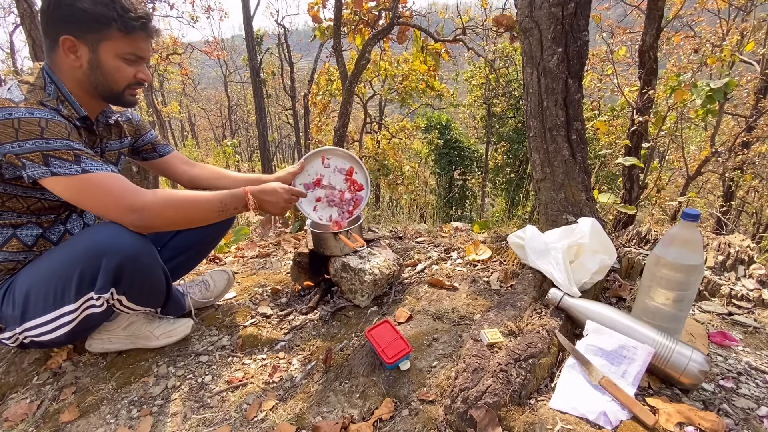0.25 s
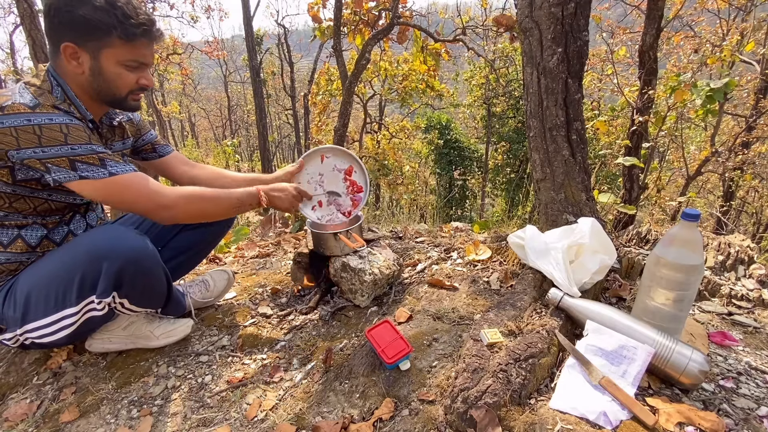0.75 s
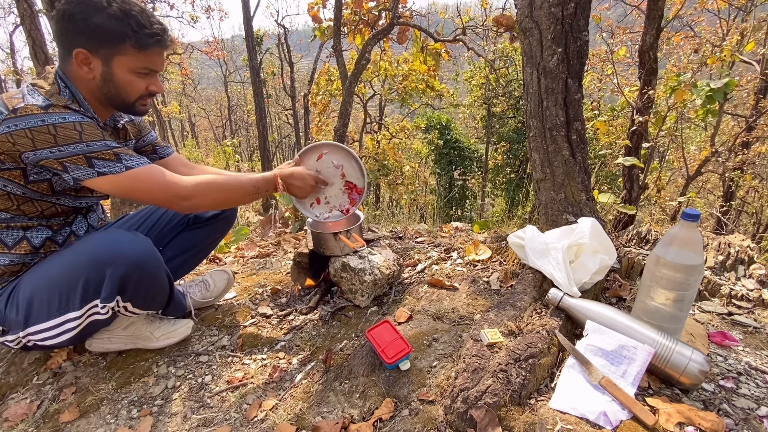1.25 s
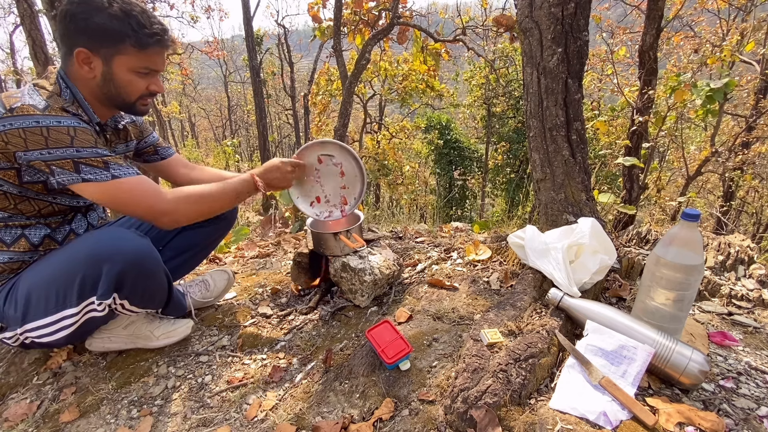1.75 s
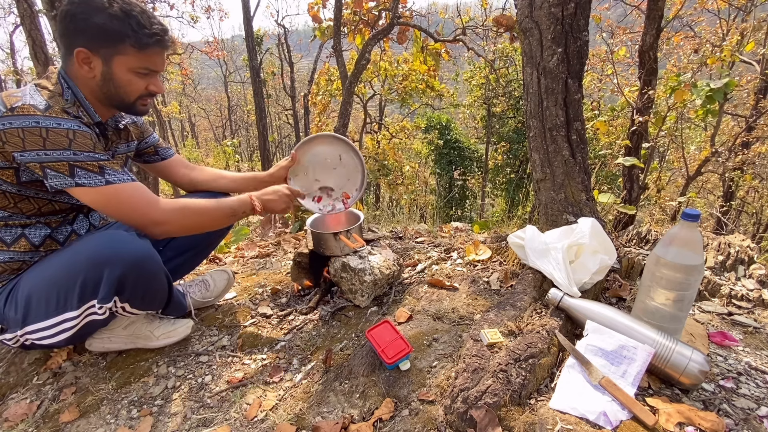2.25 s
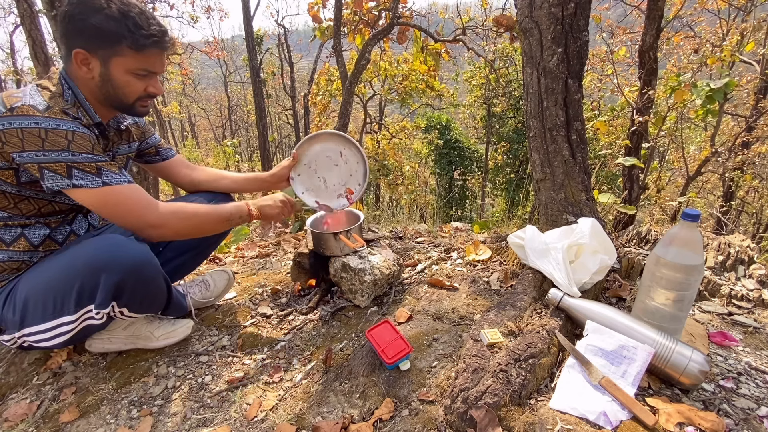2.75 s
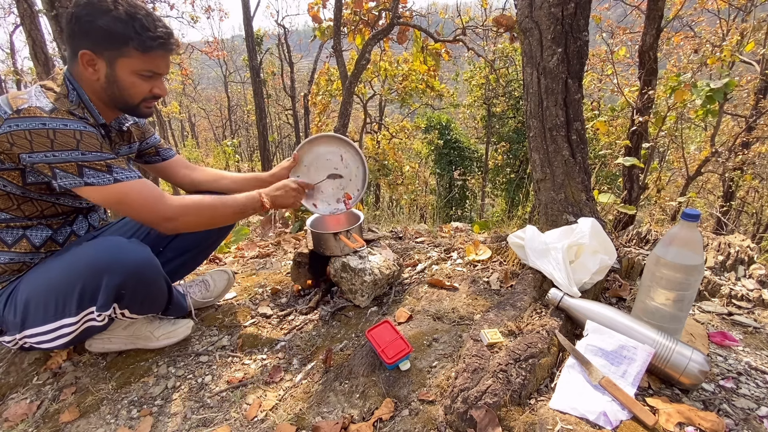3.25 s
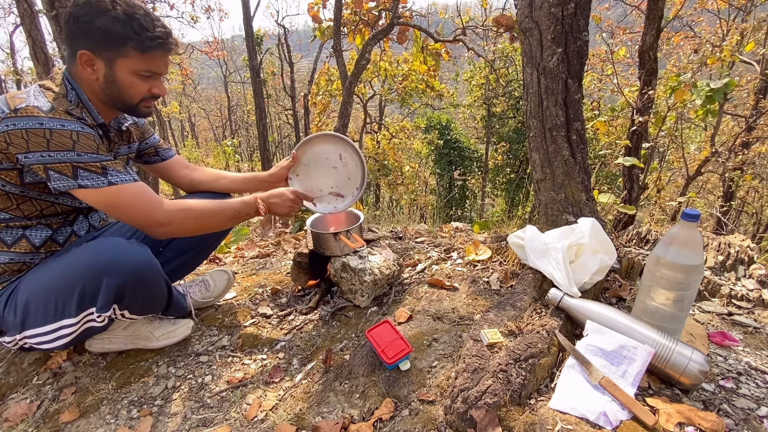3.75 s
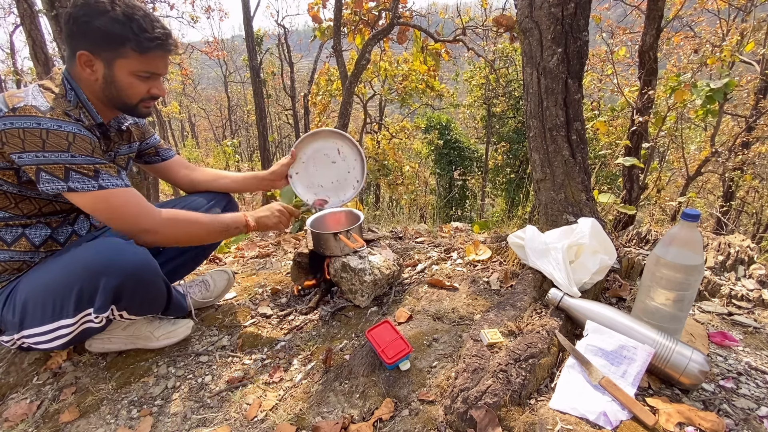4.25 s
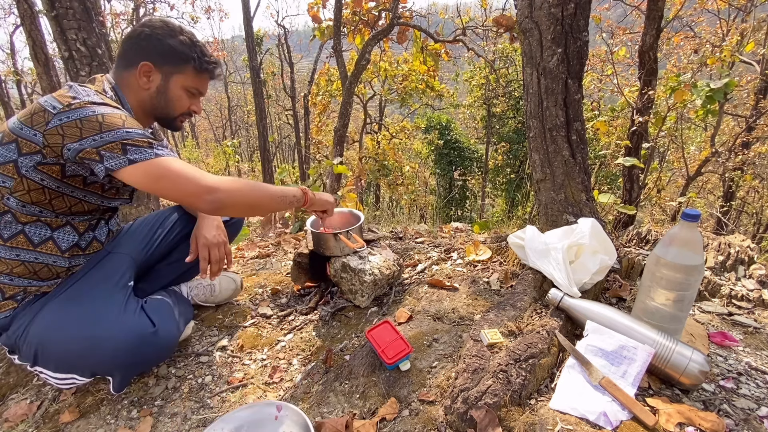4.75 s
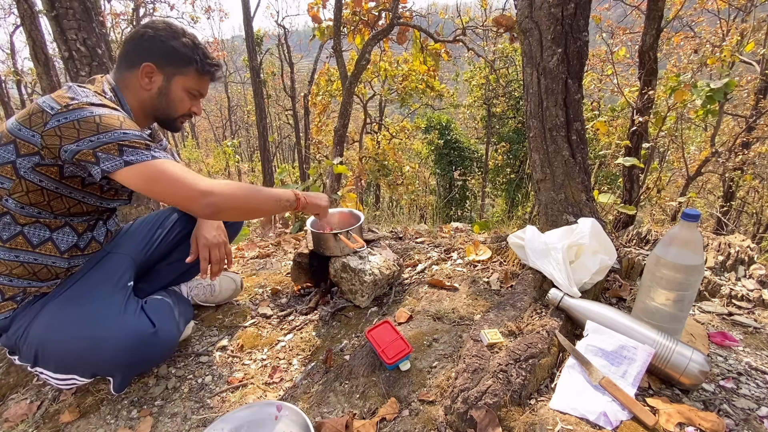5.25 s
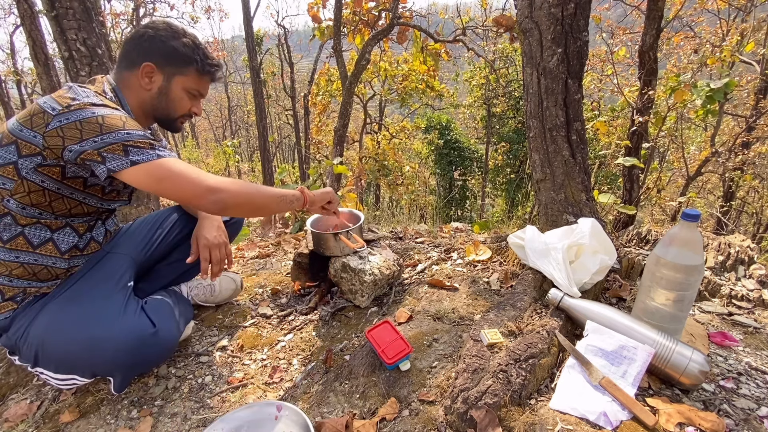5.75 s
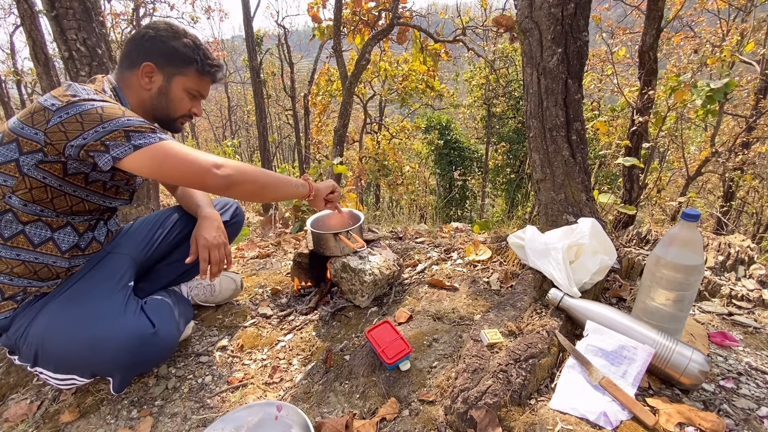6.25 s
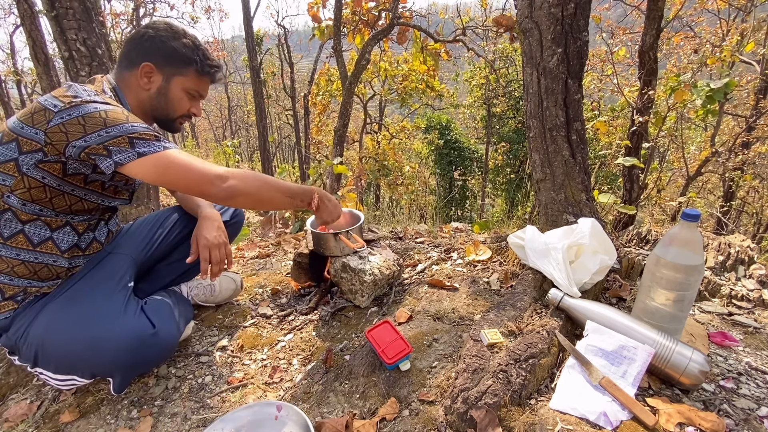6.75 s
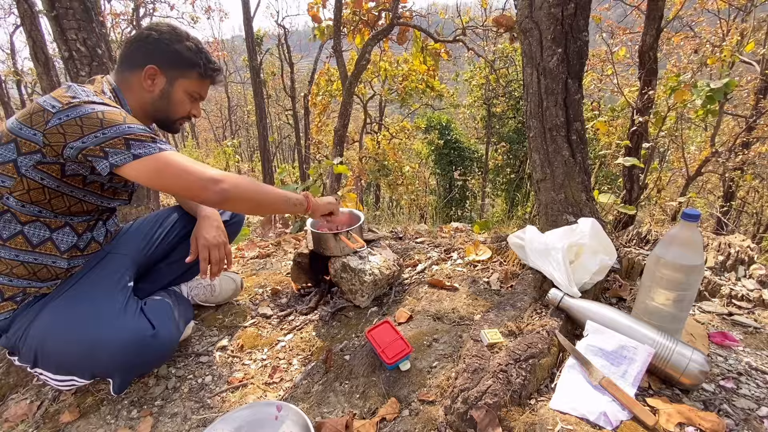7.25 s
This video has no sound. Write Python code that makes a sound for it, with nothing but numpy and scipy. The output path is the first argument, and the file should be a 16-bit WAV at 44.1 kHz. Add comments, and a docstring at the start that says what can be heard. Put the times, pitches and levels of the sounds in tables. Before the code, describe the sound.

Close, bright frying sizzle in a small steel pot, with occasional sharp oil spits and a faint low engine drone far behind. Two soft pot taps come first, then a spoon knocks and scrapes a steel plate in uneven bursts for about four seconds. After an abrupt cut, the spoon stirs and taps the pot with short damped clinks. A last cut makes the sizzle jump much louder. Outdoors, dry, close stereo microphone.

```python
"""Oil sizzles in a small steel pot while two far engines drone over a low rumble; a spoon taps the pot.
The spoon then knocks and scrapes a steel plate, and after a cut it stirs and taps the pot. After a second cut
the sizzle turns fierce. Sections two and three fade in quickly.
Frying is burst-gated noise, blows are ringing modes with noise clatter and short damped notes, scrapes are
gated hiss and resonances with bending notes, and engines are stacked sine orders."""
import sys
import numpy as np
from scipy import signal
from scipy.fft import rfft, irfft, next_fast_len
from scipy.io import wavfile
from scipy.ndimage import uniform_filter1d, map_coordinates

SR = 44100
rng = np.random.default_rng(int(sys.argv[2]) if len(sys.argv) > 2 else 0)


def store_wav(level_fs):
    """Save 16-bit WAV to argv[1]."""
    pcm = np.round(np.clip(np.atleast_2d(level_fs), -1, 1) * 32767)
    wavfile.write(sys.argv[1], SR, pcm.T.astype(np.int16))


N = 330309
T = np.arange(N) / SR

# Section starts after the first, and the fade-in: a linear ramp held above a floor, one floor per section
CUTS_S = (4.293, 7.398)
FADE_IN_S, FADE_FROM_DB = 0.036, (0, -24, -11)
# Levels for sections one to three; fizz and sputter ride on the sizzle level
FIZZ_DB, SPUTTER_DB, RUMBLE_DB = (2.5, 3, -34), (-4.5, 2, 8.5), (-47, -50.5, -49)

# How hard the oil sizzles, and how much the pot's air sings over it: t/s, sizzle level/dB, cavity level/dB
SIZZLE = [(0, -31.5, -14.5), (.5, -35, -8.5), (1.5, -36, -7), (2.1, -37, -7.5), (2.9, -37.5, -8.5),
          (3.6, -38, -6), (4.25, -38, -7.5), (4.35, -39.5, -2.5), (5.4, -37, -4.5), (5.9, -38.5, -6.5),
          (6.4, -40, -5), (7.0, -39, -2), (7.397, -37.5, -2.5), (7.414, -28.5, -5.5), (7.49, -28, -1.5)]
# Tone of the fine bubbles: f/Hz, relative level/dB
FIZZ_TONE = [(2000, -28), (5000, -3), (7500, -2), (9000, -3), (11000, 1.5), (13000, 0), (14200, -2.5),
             (15500, 2.5), (17000, 0)]
# Tone of the coarse bubbles: f/Hz, relative level/dB
SPUTTER_TONE = [(300, -15), (1500, -8.5), (3000, 1), (4200, 3.5), (5500, 3.5), (7000, 0.5), (9000, -4),
                (13000, -4), (17000, -6.5)]
# Air resonances in the pot: f/Hz, width/Hz, relative level/dB
CAVITY = [(655, 57, -5), (1455, 100, 3.5), (2214, 68, 1), (2706, 390, 0.5), (3370, 510, -7.5)]
# Oil spits: t/s, starting level/dB
SPITS = [(0.364, -19), (0.4569, -21), (0.5338, -17.5), (0.834, -27), (1.4135, -15.5), (1.4828, -33),
         (2.0178, -34), (3.157, -22), (3.4888, -15.5), (5.096, -32), (5.3025, -22), (6.111, -22),
         (6.143, -20.5), (7.4125, -9.5), (7.458, -17)]

# Tone of the distant rumble: f/Hz, relative level/dB
RUMBLE_TONE = [(20, -52), (35, -4), (60, 4.5), (120, -2.5), (200, -5), (350, -11.5), (600, -18.5),
               (1200, -30), (3000, -45)]
# First far engine: t/s, cycle f/Hz, relative level/dB
ENGINE_A = [(0.0, 34.6, -68), (0.25, 34.5, -41.5), (0.65, 34.14, -43.5), (1.06, 35.62, -46.5),
            (3.1, 35.9, -47.5), (4.28, 35.52, -44), (4.32, 37.68, -44.5), (5.9, 32.63, -52),
            (6.1, 34.2, -43), (7.39, 34.3, -41.5), (7.42, 34.4, -62)]
# Its strong orders: multiple of the cycle, relative level/dB
ORDERS_A = [(2, 1), (3, -17.5), (4, -16.5), (5, -5.5), (6, -11), (10, -17.5)]
# Second far engine: t/s, cycle f/Hz, relative level/dB
ENGINE_B = [(0.0, 27.3, -53.5), (0.5, 27.86, -57), (1.1, 26.56, -54.5), (2.1, 23.05, -57),
            (2.88, 24.32, -49.5), (4.29, 28.03, -51)]
# Its strong orders: multiple of the cycle, relative level/dB
ORDERS_B = [(2, 2), (3, 0.5), (4, 4.5), (5, 2), (6, 7), (7, -10)]

# Spoon blows on the pot: t/s, relative strength/dB, weight (low-mode boost)/dB, brightness (high-mode boost)/dB,
# struck-spot f/Hz, spot boost/dB, ring-time multiplier, clatter relative level/dB, clatter t60/s,
# rise time constant/s
POT_BLOWS = [(0.095, -14, -3, -17, 1430, 1.3, 0.67, 27.7, 0.074, 0.00066),
             (0.217, -20, 8, -22, 950, 11, 0.21, 24.4, 0.064, .0005),
             (4.598, -10.5, -12, 2, 1200, 12, 0.093, 23.5, 0.018, 0.00051),
             (4.671, -19.5, -11, -20, 1377, 14.5, 0.18, 21.6, 0.054, 0.00079),
             (4.814, -19, -4, -1, 1740, 6.1, 0.21, 31.5, 0.037, 0.00052),
             (4.869, -6.5, -33, -4, 1600, 9.5, 0.069, 15.4, 0.087, 0.00068),
             (5.196, 1, -12, -5, 1330, 8, 0.1, 23.6, 0.071, 0.00067),
             (5.564, -13.5, -12, 1.5, 1061, 7.6, 0.21, 24.6, 0.08, 0.0003),
             (5.918, -26, -8, -10, 2990, 18, .37, 33.3, 0.15, 0.0013),
             (5.94, -19, -9, -18, 820, 4.2, 0.93, 29.4, 0.47, 0.0011),
             (6.028, -25, -11, -19, 792, 8, 0.21, 28, 0.095, .001),
             (6.327, -2, 11.5, 14.5, 1600, 18, 0.22, 17.5, 0.054, 0.00067),
             (6.330, -10, -13, 11, 4150, 10.6, 0.65, 21, 0.033, 0.00049),
             (6.41, -31, -10, -10, 1459, 6.1, 1, 15, .05, 0.0023),
             (7.083, 0, 0, 12, 1720, 8.4, 0.5, 20.9, 0.029, 0.00097),
             (7.086, -14.5, -15, 8, 5040, 25, 0.46, 13, 0.033, 0.0011)]
# Spoon blows on the plate: same columns as the pot blows
PLATE_BLOWS = [(0.5735, -2, -4.5, -2.5, 403, 19, 0.18, 21.5, 0.073, 0.00026),
               (0.975, -30.5, 16, 1, 1390, 11, 0.23, 32.5, 0.071, 0.00045),
               (1.082, -3.5, 2.5, 2, 2540, 11.5, 0.17, 30.5, 0.061, 0.00072),
               (1.086, -20.5, 15, -8, 352, 22, 0.35, 11, 0.11, 0.0018),
               (1.656, 0.5, -1, 3, 2830, 12.5, 0.28, 25.5, 0.055, 0.00022),
               (1.657, -12.5, -5, -7, 883, 12.5, 0.36, 15, 0.046, 0.00071),
               (1.716, -17, 3, 9, 796, 12, 0.28, 25.5, 0.074, 0.00044),
               (1.775, -11.5, -11, -1, 2610, 9, 0.78, 24.5, 0.12, 0.0059),
               (2.092, -4.5, 2, -3, 1500, 3, 0.4, 21, 0.11, 0.00037),
               (2.131, -21.5, -28, 20.5, 1510, 12, 0.48, 24.5, 0.18, 0.007),
               (2.274, -16, 1, 17.5, 463, 8.5, 0.35, 25.5, 0.041, 0.0023),
               (2.53, 4, 4, -0.5, 923, 14, 0.13, 16.5, 0.08, 0.00078),
               (2.533, -8, -21, 2, 1800, 14, 0.4, 23, 0.039, .001),
               (2.579, -12.5, -1, 4, 2807, 7, 0.63, 22, 0.055, 0.0029),
               (2.635, -15.5, -16, 16, 1750, 1, 0.69, 7, 0.053, 0.0028),
               (2.712, -32, -2, 10, 835, 21, 0.74, 15, 0.044, 0.0058),
               (2.946, 2.5, -4, -6.5, 927, 9, 0.39, 18.5, 0.12, 0.0003),
               (2.951, -7.5, -19, 6, 1797, 14, 0.36, 24.5, 0.039, 0.00087),
               (3.053, -13.5, -25, 16, 2060, 10, 0.87, 31, 0.053, 0.0067),
               (3.073, -9, -4, -5, 460, 5, 0.23, 10, 0.042, 0.0014),
               (3.257, 3, -1.5, -0.5, 636, 15, 0.31, 19.5, 0.16, 0.00043),
               (3.263, -3, -2, -3, 539, 19, 0.35, 18, .1, 0.0022),
               (3.26, -12.5, -17, -4, 1800, 18, 0.46, 14, .05, 0.001),
               (3.367, -14.5, -2, -1, 450, 15, 0.27, 21.5, 0.086, 0.0013),
               (3.6095, -4, -1, -1.5, 845, 5.5, 0.94, 22.5, 0.11, 0.00032),
               (3.669, -10, -5, 2.5, 2634, 11.5, 0.5, 30, 0.058, 0.00068),
               (3.861, -10.5, 0, 2, 878, 20, 1.42, 31.5, 0.11, 0.00071),
               (4.011, -27.5, -2, 7.5, 2580, 10, 0.16, 36.5, 0.031, 0.00088),
               (4.112, -2.5, 8.5, 0, 2400, 11.5, 0.63, 24.5, 0.066, 0.00051),
               (4.114, -17, -10, 3, 4370, 18, 0.4, 29.5, 0.099, 0.0008),
               (4.19, -24.5, 10, -5, 450, 18, 0.29, 29, 0.074, 0.0026)]
# Pitches of the pot's modes: f/Hz
POT_HZ = [640, 1095, 1459, 1812, 1960, 2218, 2520, 3042, 3450, 3850, 4143, 4312, 4976, 5300, 5730, 5990,
          7075, 7967, 8860, 9372]
# The same pot modes in order: relative level/dB, base ring time/s
POT = [(-8.5, 0.23), (-44, 0.39), (6.5, 0.26), (-5, 0.066), (-36, 0.06), (-10, 0.12), (4, 0.16),
       (1.5, 0.087), (-4, 0.16), (-12, 0.11), (0, 0.082), (-23, 0.056), (0, 0.11), (-5, 0.049),
       (-2.5, 0.062), (-4, 0.076), (-13.5, .09), (-29, .05), (-7, 0.025), (-25, .03)]
# Pitches of the plate's modes: f/Hz
PLATE_HZ = [365, 458, 560, 680, 760, 867, 931, 1055, 1217, 1292, 1421, 1593, 1728, 1981, 2067, 2245, 2606,
            2778, 3270, 3682, 4355, 4985, 5770, 6800, 7270, 8300, 8620, 9600]
# The same plate modes in order: relative level/dB, base ring time/s
PLATE = [(-14, 0.16), (-6, 0.32), (-20, 0.24), (-10.5, 0.079), (-7.5, 0.019), (1, 0.15), (-13, 0.56),
         (-0.5, 0.14), (-5.5, 0.25), (-2.5, 0.11), (-5, 0.27), (-13, 0.34), (-1, 0.13), (-26, 0.13),
         (-10, 0.13), (-2.5, 0.091), (3, 0.067), (-7.5, 0.26), (-8, 0.18), (-9.5, 0.21), (-4.5, 0.1),
         (3, 0.014), (-1, 0.082), (1, 0.055), (1.5, 0.04), (-8, 0.026), (9.5, 0.042), (-6.5, 0.066)]
# How a spoon blow drives steel: f/Hz, relative level/dB
STRIKE = [(230, -27), (365, -23), (460, -23), (650, -21), (900, -20), (1400, -21.5), (1800, -16.5),
          (2600, -20.5), (4500, -17.5), (9000, -20)]
SPOT_OCTAVES = 0.14  # spread of the boost around the struck spot's pitch
# Weight is full below its first pitch and gone at the second; brightness grows between its two
HEAVY_HZ, BRIGHT_HZ = (370, 800), (2000, 9000)

# Spoon drags over the plate: t/s, length/s, hiss relative level/dB, ring relative level/dB, ring fade/(dB/s)
PLATE_STROKES = [(.57, 0.24, -38.5, -54, 40), (1.17, 0.21, -44.5, -37.5, 3), (1.68, 0.23, -43.5, -29.5, 38),
                 (2.12, 0.19, -40, -39, 2), (2.55, 0.16, -39.5, -36.5, 40), (2.96, 0.12, -36.5, -29, 90),
                 (3.28, 0.179, -44.5, -26.5, 120), (3.63, 0.08, -53, -27, 102), (4.13, 0.14, -42, -30, 54)]
# Spoon drags over the pot: same columns as the plate strokes
POT_STROKES = [(5.91, 0.12, -52, -26, 19), (6.34, 0.155, -45.5, -26.5, 5.1)]
# The dragging spoon bites the plate: t/s, hiss relative level/dB, ring relative level/dB, nominal length/s
PLATE_BITES = [(0.61, -46, -26, 0.025), (0.699, -52, -50, 0.0074), (0.739, -41.5, -39, 0.027),
               (1.213, -55, -24, 0.0061), (1.266, -46, -63, 0.029), (1.783, -38.5, -44, 0.04),
               (1.882, -44, -47, 0.025), (2.146, -42, -48, 0.012), (2.172, -52, -52, .01),
               (2.208, -42, -45, 0.015), (2.238, -40, -50, 0.014), (2.274, -35, -31.5, 0.014),
               (2.568, -44, -45, .01), (2.587, -41, -33, 0.014), (2.648, -34, -53, 0.021),
               (2.715, -45, -54, 0.024), (3.063, -26.5, -42, 0.0097), (3.34, -41, -55, 0.0092),
               (3.421, -47, -36.5, 0.023), (4.2, -43, -31, 0.038)]
# The dragging spoon bites the pot: same columns as the plate bites
POT_BITES = [(4.872, -39, -31, 0.023), (6.4, -48, -33, 0.012), (6.455, -49, -30, 0.022),
             (7.15, -51, -29, 0.0082)]
# Tone of the scraping edge: f/Hz, relative level/dB
EDGE_TONE = [(1000, -17.0), (3000, -2.5), (4500, 0.5), (6500, 3.5), (12000, -1.0), (17000, -1.5)]
ATTACK_S, RELEASE_S, HISS_FADE_DB_S = 0.0074, 0.031, 20  # shape of a stroke

# Short damped notes on plate and pot, small knocks and single partials ringing within the larger blows:
# t/s, f/Hz, level/dB, t60/s
SHORT_NOTES = [(.593, 800, -32, 0.033), (.597, 4530, -25, 0.063), (.613, 2220, -22, 0.048),
               (.576, 4570, -25, .04), (.578, 2180, -26, 0.033), (.618, 1140, -22, 0.036),
               (.65, 2240, -37, .04), (.668, 1450, -41, 0.041), (.686, 1810, -33, .02),
               (.696, 1710, -32, .02), (.697, 2300, -35, .02), (.708, 2250, -34, .02),
               (.73, 3000, -35, .04), (.729, 1950, -31, .04), (1.213, 2650, -35, .04),
               (1.217, 2050, -31, .03), (1.219, 915, -32, 0.033), (1.221, 1280, -29, 0.03),
               (1.273, 3530, -26, 0.035), (1.274, 4130, -27, 0.033), (1.278, 2210, -32, .03),
               (1.298, 3620, -27, 0.033), (1.305, 1480, -38, .03), (1.322, 1800, -34, .03),
               (1.348, 2950, -29, .04), (1.657, 4170, -13, .04), (1.66, 5780, -13, .05),
               (1.72, 3600, -24, .03), (1.728, 1490, -28, .06), (1.722, 2770, -24.5, 0.088),
               (1.778, 3720, -28, .04), (1.785, 4260, -26, .03), (1.844, 2780, -33, .05),
               (1.745, 990, -26, .03), (1.771, 1870, -23, 0.067), (1.783, 2810, -29, .05),
               (1.798, 2180, -22, 0.043), (1.869, 1004, -29, .03), (2.13, 1795, -24, 0.076),
               (2.151, 1180, -22.5, .04), (2.196, 1880, -28, .04), (2.093, 1750, -17, 0.023),
               (2.092, 2634, -23, 0.11), (2.13, 2770, -25, 0.044), (2.143, 3100, -22, .03),
               (2.2, 2300, -34, 0.087), (2.274, 960, -24, .03), (2.276, 4440, -21, .03),
               (2.292, 860, -34, .15), (2.228, 2920, -37, .03), (2.234, 1600, -32, .02),
               (2.274, 2990, -20.5, 0.059), (2.274, 6800, -27, 0.027), (2.533, 5100, -16, .04),
               (2.533, 6000, -16, .05), (2.535, 3800, -22, 0.06), (2.568, 3860, -21, .03),
               (2.57, 5070, -26, 0.13), (2.578, 6200, -20, .05), (2.582, 3280, -28, .05),
               (2.586, 2080, -23, .04), (2.64, 1480, -29, .06), (2.643, 3260, -26, .05),
               (2.588, 2800, -20, 0.043), (2.604, 920, -30, 0.096), (2.631, 1850, -24, 0.049),
               (2.645, 5960, -16, 0.034), (2.65, 2580, -24, 0.077), (2.696, 2780, -30, 0.095),
               (2.718, 2790, -26, .04), (2.95, 2600, -17, .06), (2.95, 4400, -22, 0.057),
               (2.972, 1760, -30, 0.032), (3.0, 1000, -31, .08), (3.061, 3100, -25, .04),
               (3.145, 1850, -37, 0.082), (3.061, 2180, -18, 0.044), (3.064, 4320, -28, 0.027),
               (3.082, 2780, -30, .08), (3.258, 850, -13, .1), (3.259, 470, -18.5, 0.11),
               (3.26, 1090, -17, 0.092), (3.272, 2700, -22, .05), (3.3, 900, -26, .06),
               (3.33, 2570, -27, .04), (3.385, 1400, -35, .04), (3.405, 2900, -29, 0.031),
               (3.34, 1760, -29, .05), (3.373, 990, -27, .04), (3.425, 2730, -27, 0.051),
               (3.72, 2640, -35, 0.074), (3.863, 5020, -15.5, 0.046), (3.866, 3950, -16, 0.045),
               (3.864, 1300, -24, .09), (3.864, 1730, -23, 0.11), (4.112, 1726, -17, 0.18),
               (4.113, 2243, -20, 0.17), (4.114, 2606, -18, 0.16), (4.112, 4500, -14, .04),
               (4.116, 3280, -26, .1), (4.112, 880, -10, 0.017), (4.114, 3770, -24, 0.13),
               (4.116, 5060, -23, .1), (4.19, 4960, -25, 0.029), (4.191, 4320, -25, .04),
               (4.191, 1220, -33, 0.037), (4.222, 883, -34.5, 0.29), (4.228, 2630, -25, 0.049),
               (4.245, 2590, -29, .06), (4.265, 2660, -27, .04), (4.78, 1390, -34, .08),
               (4.814, 5660, -21, 0.036), (4.868, 4300, -28, .04), (5.196, 1082, -10, 0.04),
               (5.196, 2000, -8, 0.026), (5.198, 2720, -16, 0.027), (5.202, 1497, -14, 0.064),
               (5.942, 1500, -37, .08), (5.965, 2460, -27, .03), (6.031, 1460, -27, 0.036),
               (6.386, 1820, -34, .1), (6.397, 4280, -28, .07), (6.33, 2520, -15, 0.14),
               (6.394, 7100, -33, 0.05), (6.41, 1459, -29.5, 0.18), (6.436, 1430, -35, 0.063),
               (6.445, 4190, -29, 0.099), (6.462, 1435, -21, 0.047), (6.476, 1812, -32, 0.11),
               (6.5, 1446, -31.5, 0.17), (7.2, 1454, -31, .05)]
NOTE_RISE_S = 0.001
# Bending notes of the loaded plate under the spoon: t/s, start f/Hz, end f/Hz, relative level/dB, bend length/s
SLIDES = [(0.588, 996, 1127, -25.5, 0.029), (0.639, 876, 910, -23, 0.0055), (1.772, 1100, 1180, -20, 0.032),
          (1.814, 885, 960, -38, 0.043), (1.87, 984, 1038, -36, 0.021), (1.92, 710, 640, -27.5, 0.0034),
          (2.089, 975, 1104, -19.5, 0.026)]

# Stereo image by frequency: f/Hz, left's phase lead/rad, likeness 0-1, left minus right level/dB
STEREO_IMAGE = [(30, -0.43, 0.7, -4.5), (377, 1.56, 0.77, -2.5), (720, 1.02, 0.91, 5.5),
                (1500, 1.08, 0.97, -0.5), (3410, 2, 1, 0), (6030, 3, 0.58, 1), (7100, 2, 0.18, -1),
                (8520, 4.5, 1, -2.5), (9560, 4.5, 1, 1.5), (11960, 8, 0.7, -2.2), (13500, 11, 0.82, 3.5),
                (14340, 10, 0.91, 0.5), (16000, 9.5, 0.62, -11)]
TOP_HZ = 15800  # nothing passes from here up


def amp(db):
    """Turn decibels into gain."""
    return 10 ** (np.asarray(db) / 20)


def unit(x):
    """Bring a signal to rms 1."""
    return x / np.sqrt(np.mean(x ** 2) + 1e-20)


def along(f, v, hz):
    """Read values v, set at frequencies f, on a log axis."""
    return np.interp(np.log(hz + 1), np.log(np.asarray(f) + 1), v)


def curves(rows):
    """Draw one value per sample for each column after the time."""
    s, *cols = np.transpose(rows)
    return [np.interp(T, s, c) for c in cols]


def per_section(values):
    """Hold one value through each section."""
    return np.asarray(values)[np.searchsorted(CUTS_S, T)]


def wobble(rate):
    """Draw a smooth random curve with rate knots a second."""
    knots = rng.standard_normal(int(N * rate / SR) + 4)
    return map_coordinates(knots, [T * rate])


def filtered(x, response):
    """Pass x through a complex response of frequency."""
    m = next_fast_len(N + SR // 2)
    return irfft(rfft(x, m) * response(np.fft.rfftfreq(m, 1 / SR)), m)[..., :N]


def coloured(x, tone):
    """Shape x with a tone table, at rms 1."""
    return unit(filtered(x, lambda hz: amp(along(*np.transpose(tone), hz))))


def resonances(peaks):
    """Sum band-pass resonances (f/Hz, width/Hz, level/dB) with alternating signs."""
    def response(f):
        total = 0
        for k, (centre, width, db) in enumerate(peaks):
            damping = 1j * f * width
            total = total + (-1) ** k * amp(db) * damping / (centre * centre - f * f + damping)
        return total
    return response


def grainy(rate, spread_db, life):
    """Gate two noises alike by random bursts: rate a second, long-tailed sizes, decay constant life in s."""
    sizes = amp(spread_db * np.minimum(rng.exponential(size=N), 4))
    kicks = (rng.random(N) < rate / SR) * sizes
    gate = signal.lfilter([1], [1, -np.exp(-1 / (life * SR))], kicks)
    return unit(gate * rng.standard_normal((2, N)))


def patchy(x, depth_db):
    """Give x random patches of gain, some hundred Hz wide and some 20 ms long."""
    z = signal.stft(x, nperseg=256)[2]
    field = uniform_filter1d(rng.standard_normal(z.shape[1:]), size=2, axis=0)
    field = uniform_filter1d(field, size=7, axis=1)
    return unit(signal.istft(z * amp(depth_db * unit(field)), nperseg=256)[1][:, :N])


def spits():
    """A few oil drops spit: each is a sharp noise burst dying 60 dB in 12 ms."""
    gate, t = np.zeros(N + SR), T[:SR // 10]
    for s, db in SPITS:
        gate[round(s * SR):][:len(t)] += amp(db - 60 * t / 0.012)
    return gate[:N] * coloured(rng.standard_normal((2, N)), FIZZ_TONE)


def frying():
    """Steam bubbles burst in the oil by the thousand; the air in the pot sings along; drops spit."""
    sizzle_db, cavity_db = curves(SIZZLE)
    fine = grainy(rate=12000, spread_db=1.6, life=0.001)
    fizz = patchy(coloured(fine, FIZZ_TONE), depth_db=4)
    sputter = coloured(grainy(rate=4000, spread_db=1.2, life=0.0055), SPUTTER_TONE)
    bursts = grainy(rate=1500, spread_db=1.6, life=0.0015)
    hollow = unit(filtered(bursts, resonances(CAVITY)))
    # Each layer swells at its own pace
    fizz = amp(per_section(FIZZ_DB) + 1.2 * wobble(25)) * fizz
    sputter = amp(per_section(SPUTTER_DB) + 1.1 * wobble(6)) * sputter
    hollow = amp(cavity_db + 1.4 * wobble(14)) * hollow
    return amp(sizzle_db) * (fizz + sputter + hollow) + spits()


def engine(rows, orders):
    """Strong low orders of the firing cycle, each swelling and drifting in phase on its own."""
    hz, db = curves(rows)
    turn = 2 * np.pi * np.cumsum(hz) / SR
    tone = np.zeros(N)
    for multiple, level in orders:
        swell = amp(level + 1.7 * wobble(4))
        tone += swell * np.sin(multiple * turn + 0.5 * wobble(5))
    return amp(db - 1.0) * tone * (T <= rows[-1][0])


def distance():
    """Low noise rumbles in lumps over both draws; the two engines drone in the first draw only."""
    lumps_db = 1.7 * wobble(6) + 1.3 * wobble(2.5)
    rumble = coloured(rng.standard_normal((2, N)), RUMBLE_TONE)
    rumble = amp(per_section(RUMBLE_DB) + lumps_db) * rumble
    engines = engine(ENGINE_A, ORDERS_A) + engine(ENGINE_B, ORDERS_B)
    return rumble + engines * [[1], [0]]


def drive(hz, weight_db, bright_db, spot_hz, spot_db):
    """How strongly one blow drives each frequency, in relative dB; the struck spot favours nearby pitches."""
    spot = np.exp(-0.5 * (np.log2((hz + 1) / spot_hz) / SPOT_OCTAVES) ** 2)
    ends = weight_db * along(HEAVY_HZ, (1, 0), hz) + bright_db * along(BRIGHT_HZ, (0, 1), hz)
    return along(*np.transpose(STRIKE), hz) + ends + spot_db * spot


def blows(table, hz, modes):
    """Each blow clatters and rings the modes; the spot struck sets their balance, food and fingers damp them."""
    out, t = np.zeros((2, N + SR)), T[:SR // 3]
    hz = np.array(hz)[:, None]
    level, ring_time = np.transpose(modes)[:, :, None]
    bins = np.fft.rfftfreq(len(t), 1 / SR)
    for s, db, *touch, damping, clatter_db, clatter_t60, rise in table:
        size = amp(level + drive(hz, *touch) + rng.normal(0, 1.6, hz.shape))
        start = 2j * np.pi * rng.random(hz.shape)
        decay = np.log(1000) / (2.02 * ring_time * damping)
        ring = (size * np.exp(start + (2j * np.pi * hz - decay) * t)).sum(axis=0)
        # The spoon still touches at first, so the early ring dies faster
        ring = ring * (amp(-5.5) + amp(-60 * t / 0.77))
        # Clatter is the dense, short-lived small modes
        colour = amp(drive(bins, *touch)) * np.sqrt(1200 / (bins + 1200)) * bins / (bins + 140)
        clatter = irfft(rfft(rng.standard_normal((2, len(t)))) * colour, len(t))
        crack = amp(-31.0 - 60 * t / 0.0016)  # first contact
        clatter *= amp(clatter_db) * (amp(-60 * t / clatter_t60) + crack)
        onset = 1 - np.exp(-t / rise)
        blow = amp(db - 7.0) * ([ring.real, ring.imag] + clatter) * onset
        out[:, round(s * SR):][:, :len(t)] += blow
    return out[:, :N]


def scraping(strokes, bites, hz, modes):
    """The spoon edge chatters over steel: bright streaky hiss, and small slips that keep the modes ringing."""
    hiss, ring = np.zeros((2, N))
    for s, length, hiss_db, ring_db, ring_fade in strokes:
        press = np.interp(T - s, [0, ATTACK_S, length, length + RELEASE_S], [0, 1, 1, 0]) ** 2
        since = np.clip(T - s, 0, 1)
        hiss += press * amp(hiss_db - HISS_FADE_DB_S * since)
        ring += press * amp(ring_db - ring_fade * since)
    for s, hiss_db, ring_db, length in bites:
        near = slice(round(s * SR) - SR // 10, round(s * SR) + SR // 10)
        bump = np.exp(-0.5 * ((T[near] - s) / (0.58 * length)) ** 2)
        hiss[near] += amp(hiss_db) * bump
        ring[near] += amp(ring_db) * bump
    chatter = grainy(rate=1400, spread_db=2.2, life=0.003)
    edge = patchy(coloured(chatter, EDGE_TONE), depth_db=3.5)
    slips = ring * grainy(rate=810, spread_db=2.0, life=0.00038)
    peaks = []
    for f, (db, ring_time) in zip(hz, modes):
        soft_db = -9 * np.log2(1 + f / 2500)  # food under the edge softens the slips: high modes get less
        peaks.append((f, 4 / ring_time, db + soft_db))
    peaks.append((1400, 2200, -24))  # the broad rub of the edge
    metal = filtered(slips, resonances(peaks))
    return amp(9.5) * hiss * edge + amp(15.5) * metal


def short_notes():
    """Each short note is one damped partial with a soft start, a quarter turn apart in the two draws."""
    out, t = np.zeros(N + SR, complex), T[:SR // 4]
    onset = 1 - np.exp(-t / NOTE_RISE_S)
    for s, hz, db, t60 in SHORT_NOTES:
        note = np.exp(2j * np.pi * (hz * t + rng.random()))
        out[round(s * SR):][:len(t)] += amp(db - 60 * t / t60) * onset * note
    return np.array([out.real, out.imag])[:, :N]


def slides():
    """A note that bends as the spoon moves, with a quick start and an unsteady fade."""
    out, shake = np.zeros(N, complex), amp(3.2 * wobble(120))
    for s, start_hz, end_hz, db, length in SLIDES:
        u = T[:round(3 * length * SR)] / length
        hz = start_hz + (end_hz - start_hz) * np.minimum(u, 1)
        turn = 2 * np.pi * np.cumsum(hz) / SR
        swell = u * np.exp(-2.5 * u)
        out[round(s * SR):][:len(u)] += amp(db + 11.0) * swell * np.exp(1j * turn)
    return shake * np.array([out.real, out.imag])


def scene():
    """Two draws of the scene: what left and right share, and what sets them apart."""
    background = frying() + distance()
    pot = blows(POT_BLOWS, POT_HZ, POT) + scraping(POT_STROKES, POT_BITES, POT_HZ, POT)
    plate = blows(PLATE_BLOWS, PLATE_HZ, PLATE) + scraping(PLATE_STROKES, PLATE_BITES, PLATE_HZ, PLATE)
    return background + pot + plate + short_notes() + slides()


def record(dry):
    """Mix the draws to stereo by likeness, lead and balance; fade in, round peaks, trim bass and top."""
    f, lead, alike, balance_db = np.transpose(STEREO_IMAGE)
    sign = np.array([[1], [-1]])  # left, right

    def side(hz):
        gain = amp(sign * along(f, balance_db, hz) / 2)
        return gain * np.exp(0.5j * sign * np.interp(hz, f, lead))

    def spread(hz):
        return np.arccos(np.clip(np.interp(hz, f, alike), 0, 1)) / 2

    shared = filtered(dry[:1], lambda hz: side(hz) * np.cos(spread(hz)))
    differing = filtered(dry[1:], lambda hz: sign * side(hz) * np.sin(spread(hz)))
    # A start at -1 s leaves the first section without a fade
    ramp = (T - per_section((-1, *CUTS_S))) / FADE_IN_S
    x = (shared + differing) * np.clip(ramp, amp(per_section(FADE_FROM_DB)), 1)
    x = x / (1 + np.abs(x) ** 8) ** (1 / 8)  # soft clip towards 1
    return filtered(x, lambda hz: (hz < TOP_HZ) * hz ** 4 / (hz ** 4 + 33 ** 4))


dry = scene()
out = record(dry)
store_wav(out)
```